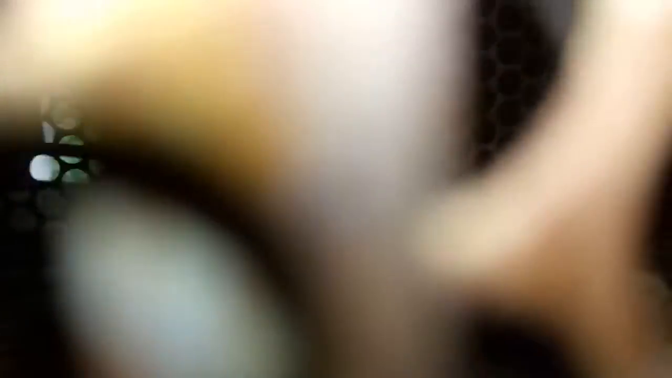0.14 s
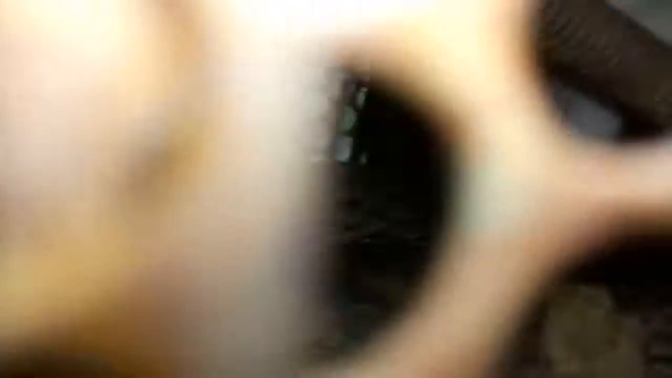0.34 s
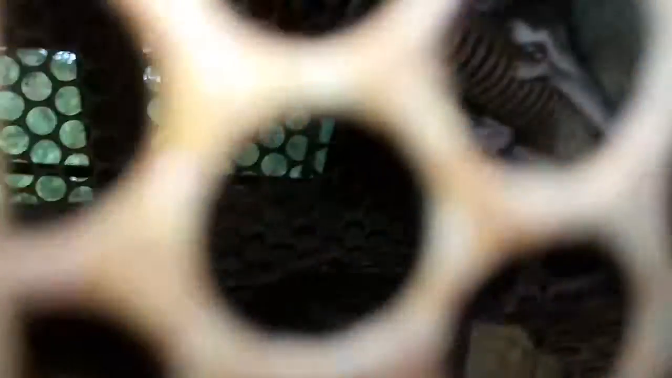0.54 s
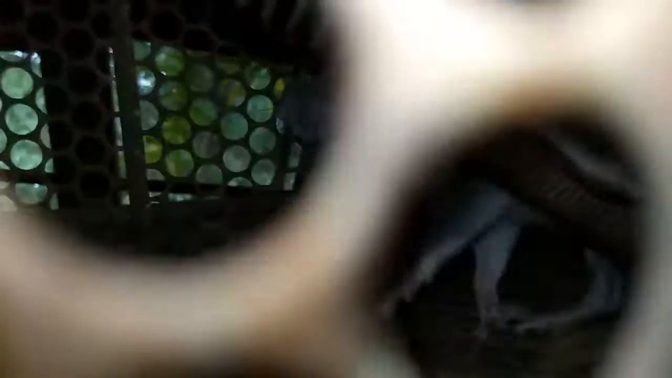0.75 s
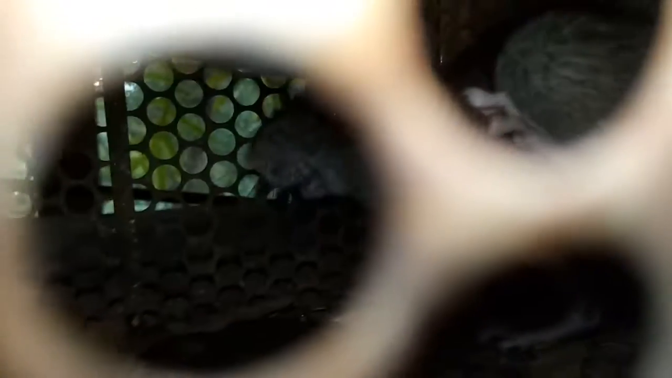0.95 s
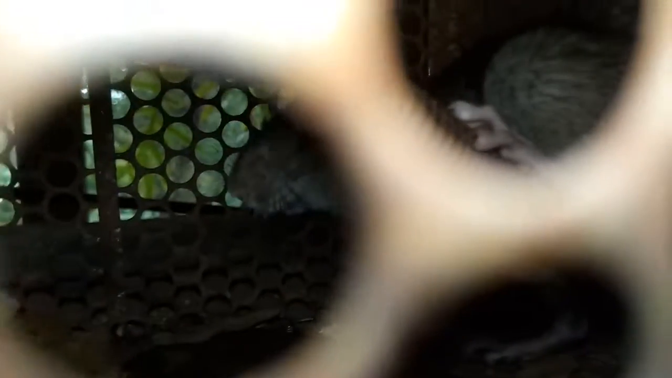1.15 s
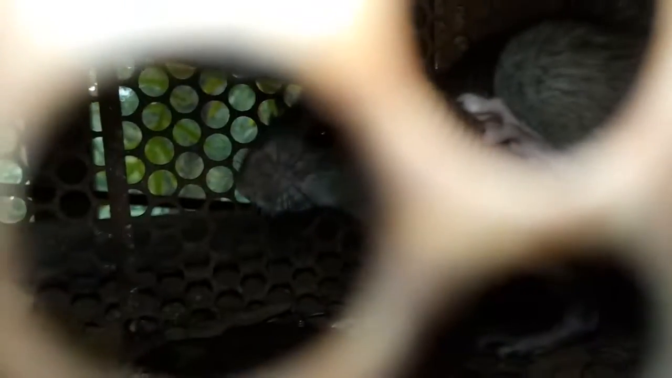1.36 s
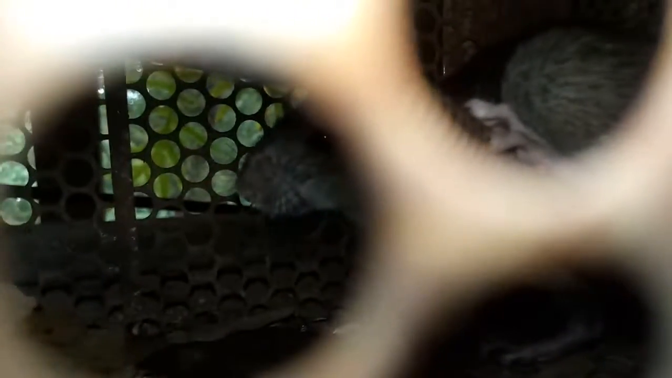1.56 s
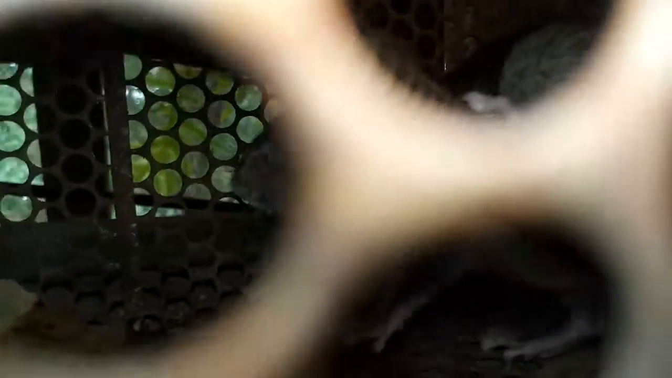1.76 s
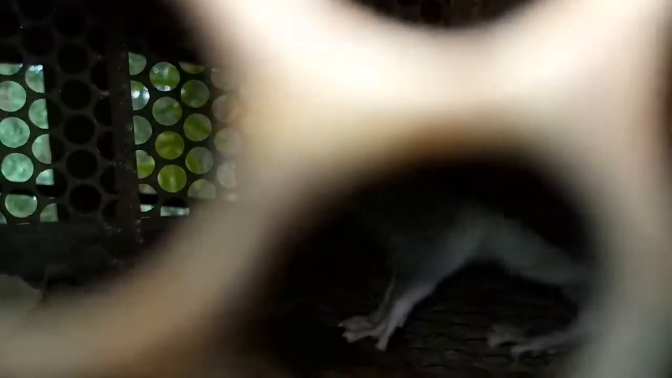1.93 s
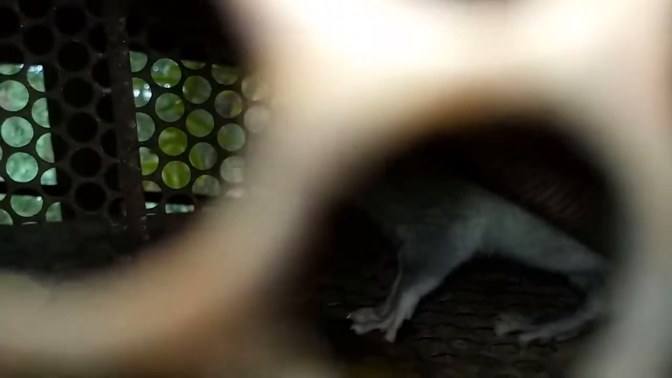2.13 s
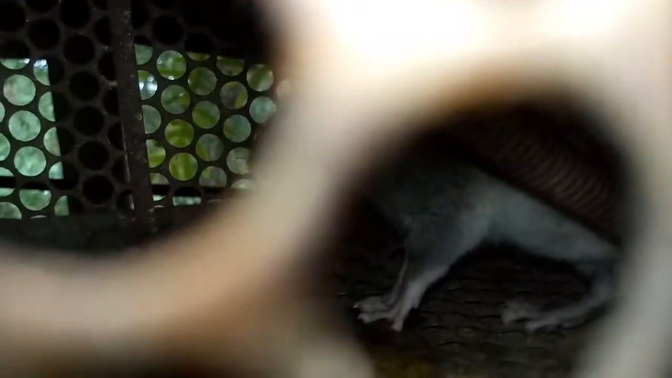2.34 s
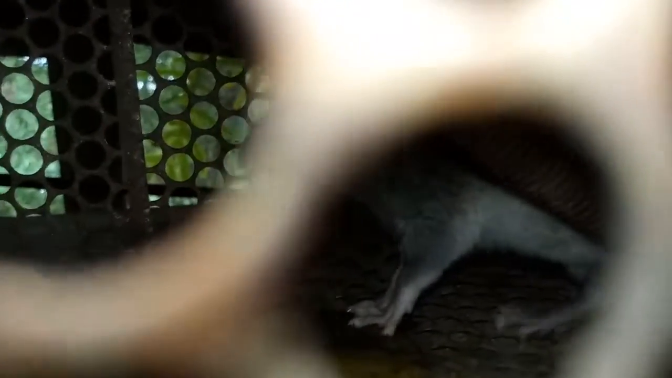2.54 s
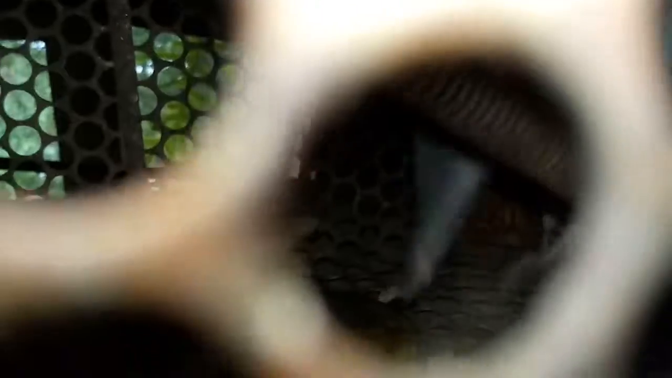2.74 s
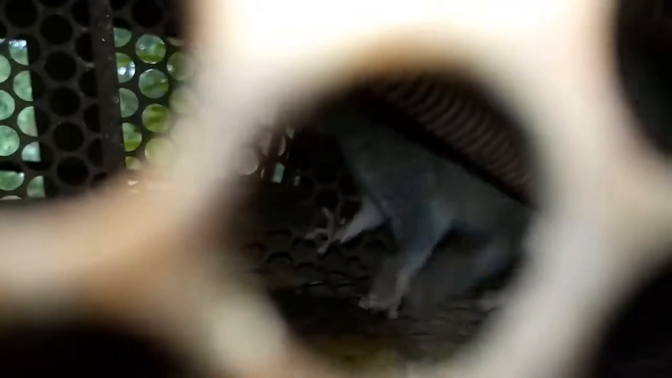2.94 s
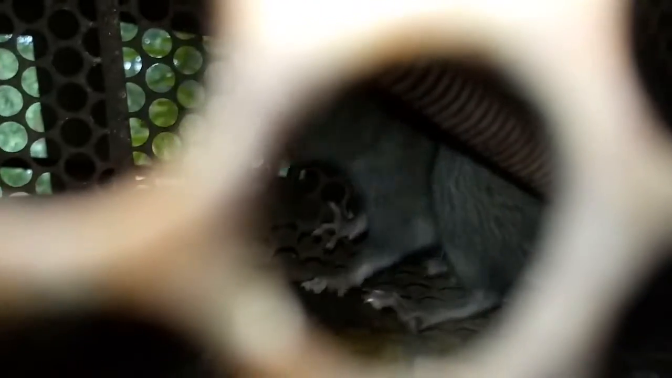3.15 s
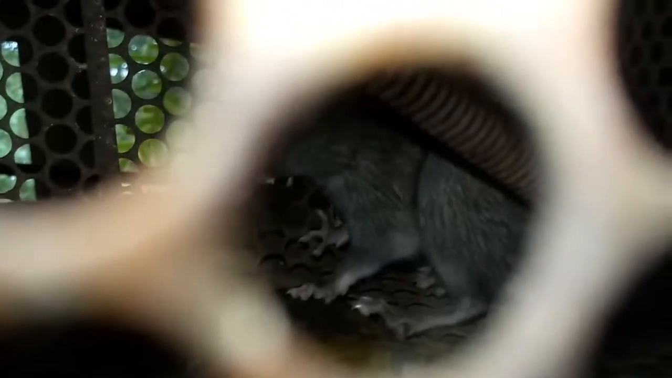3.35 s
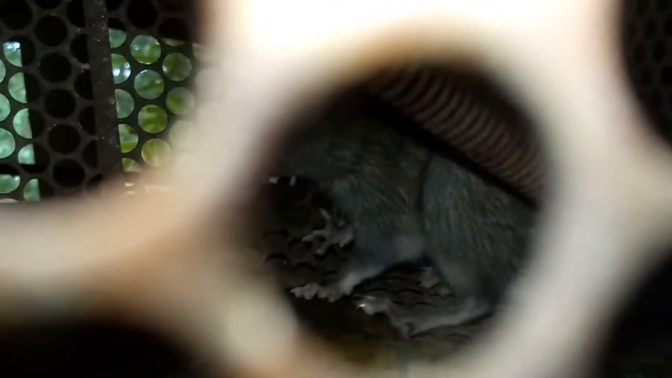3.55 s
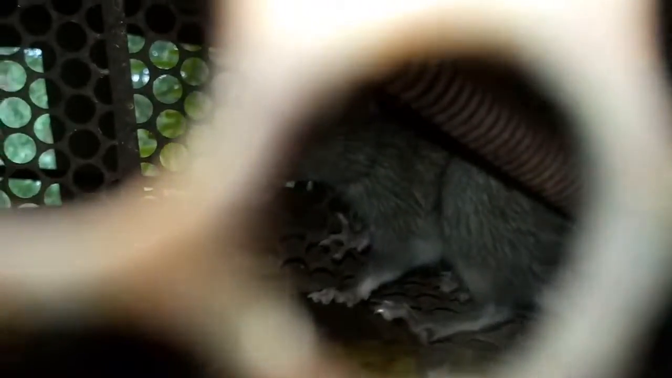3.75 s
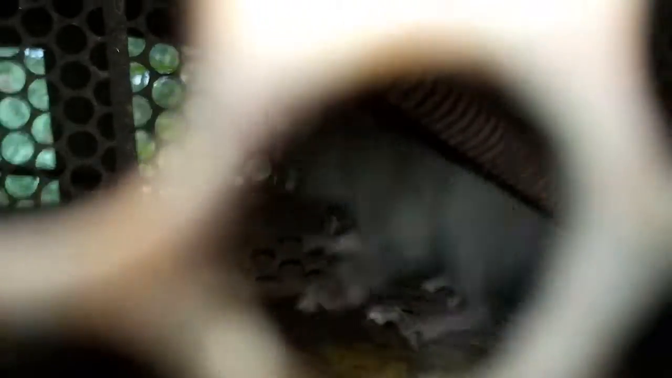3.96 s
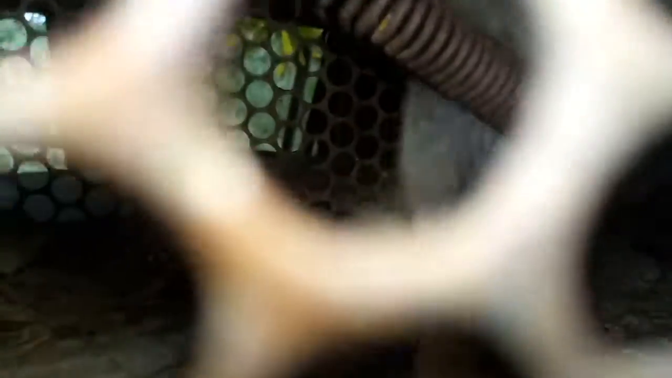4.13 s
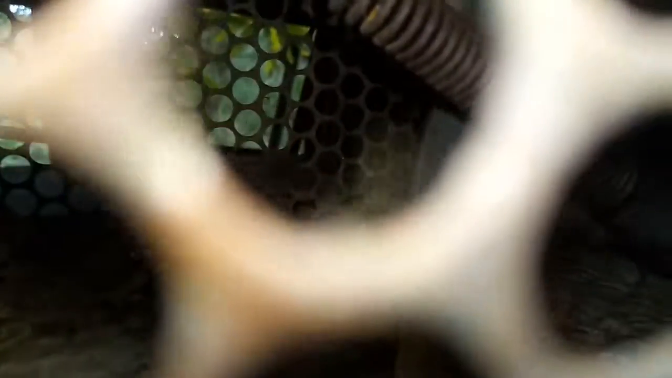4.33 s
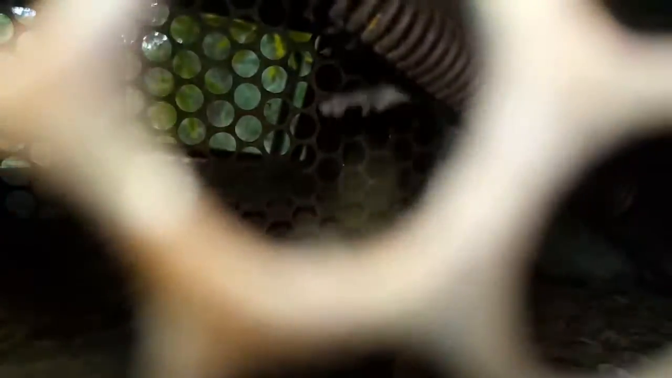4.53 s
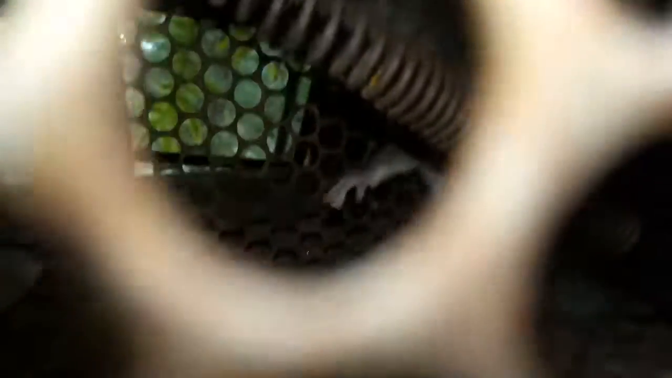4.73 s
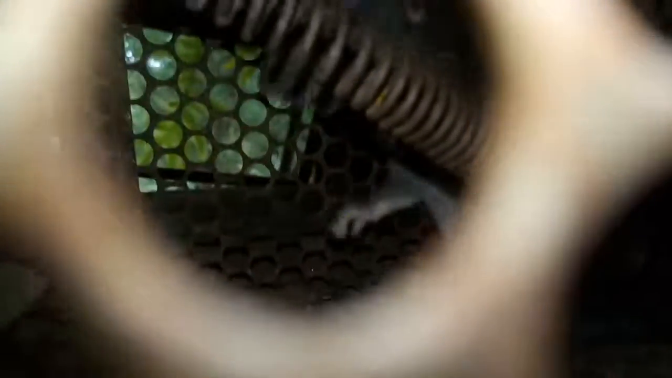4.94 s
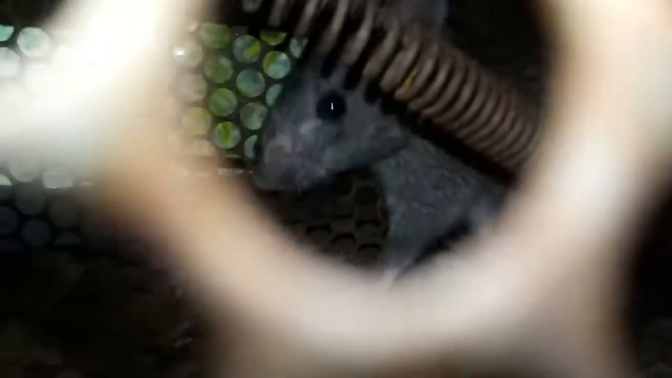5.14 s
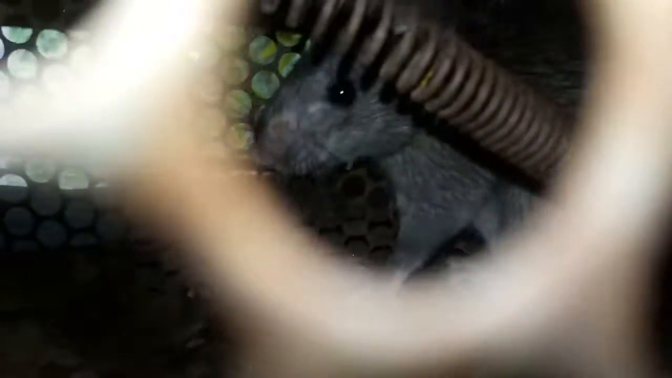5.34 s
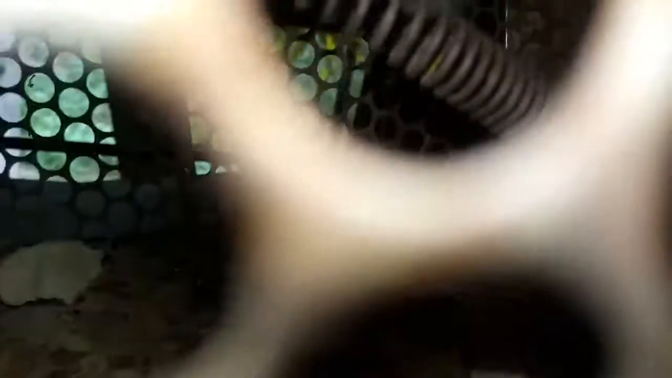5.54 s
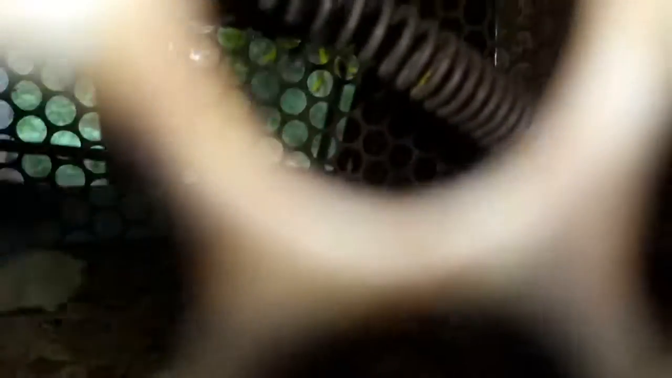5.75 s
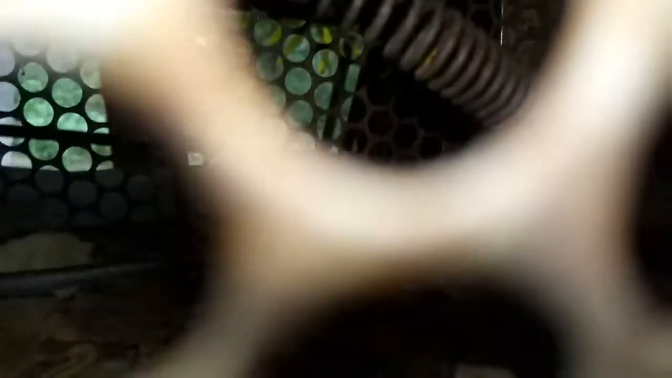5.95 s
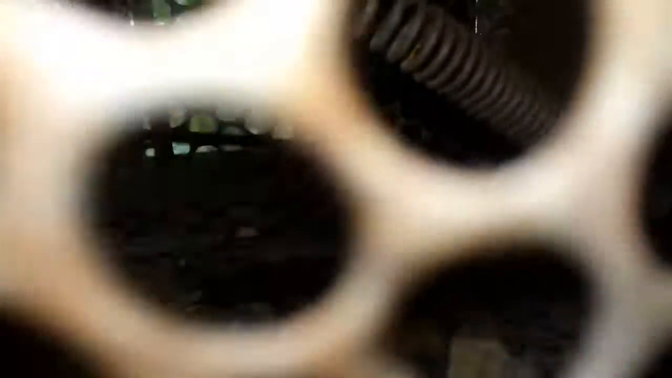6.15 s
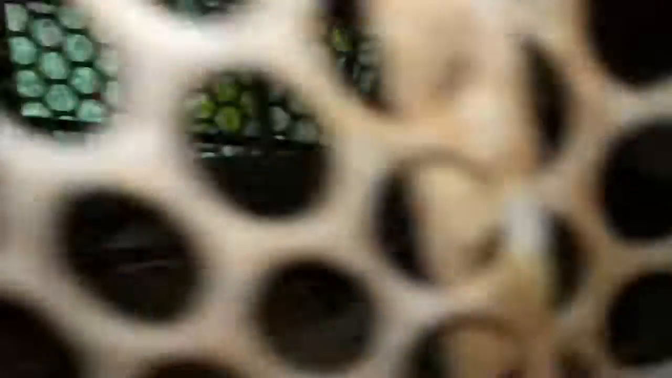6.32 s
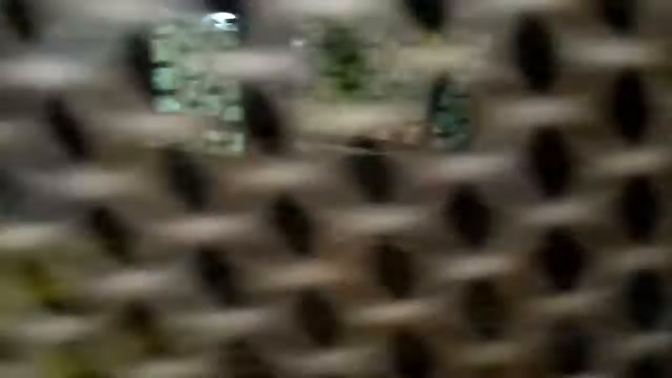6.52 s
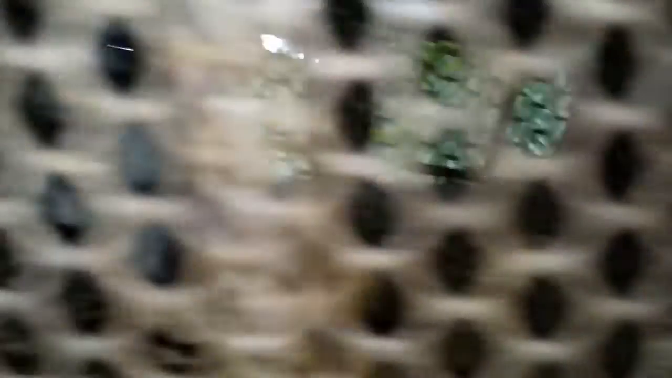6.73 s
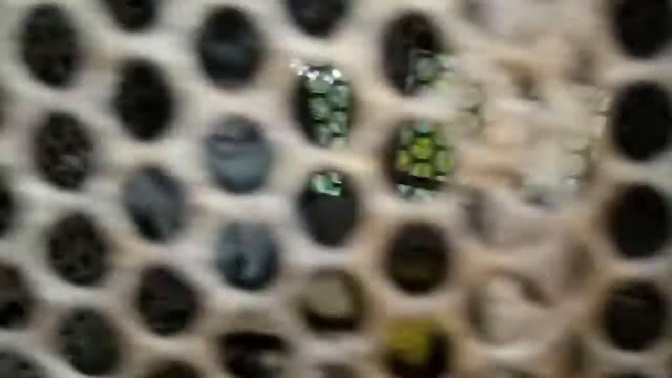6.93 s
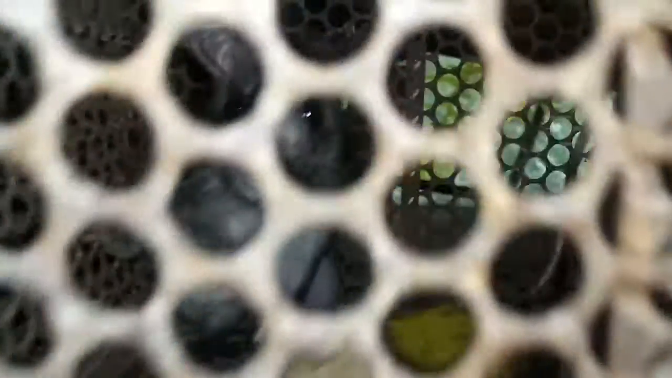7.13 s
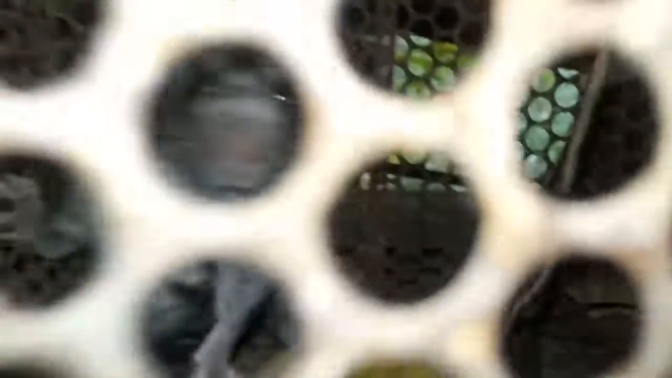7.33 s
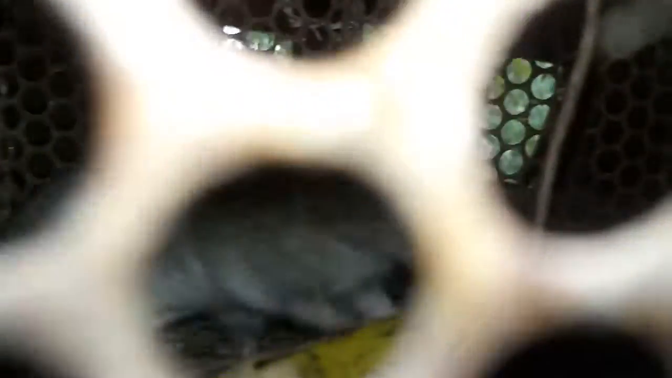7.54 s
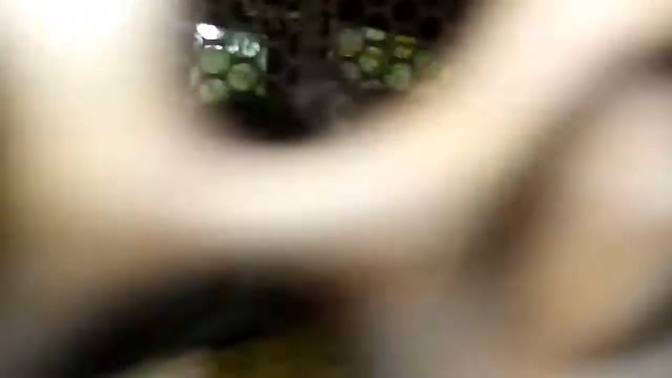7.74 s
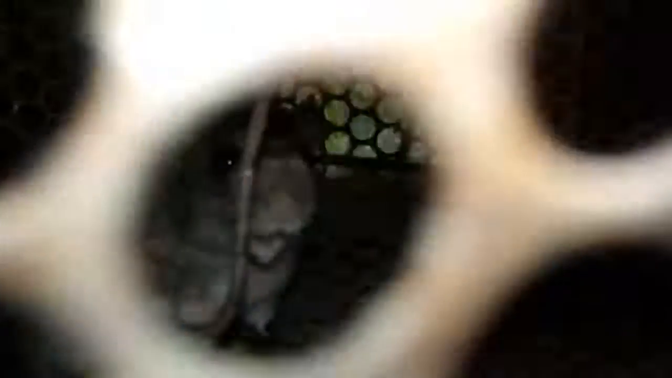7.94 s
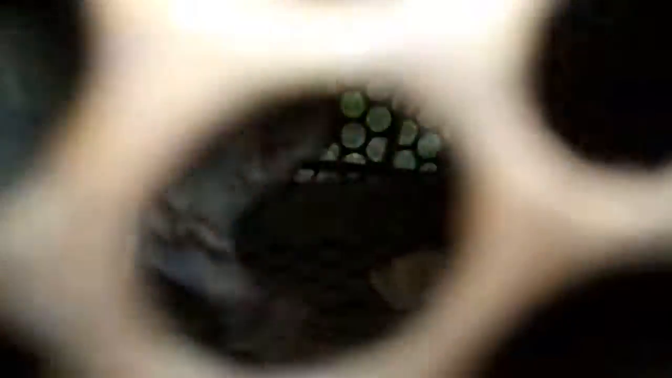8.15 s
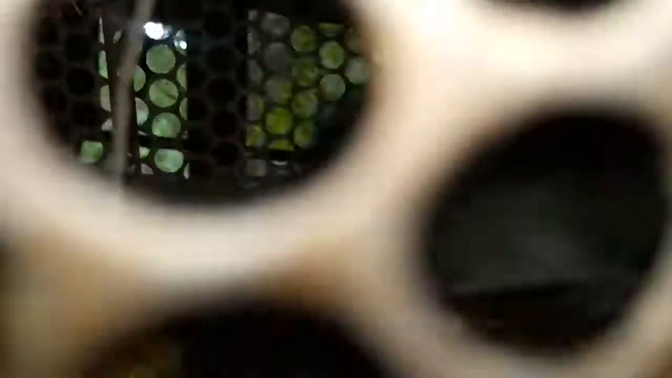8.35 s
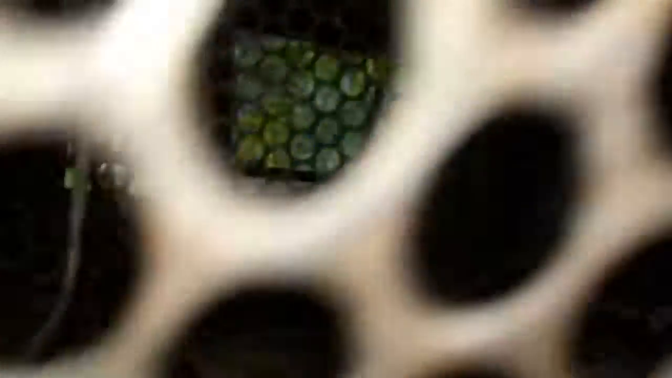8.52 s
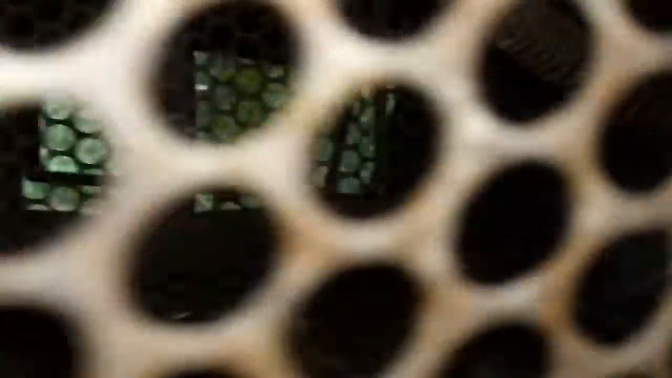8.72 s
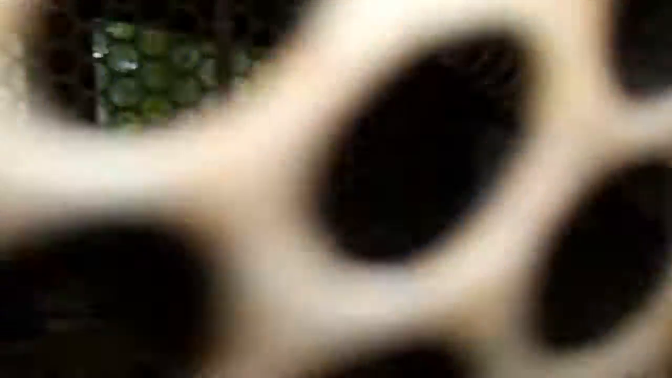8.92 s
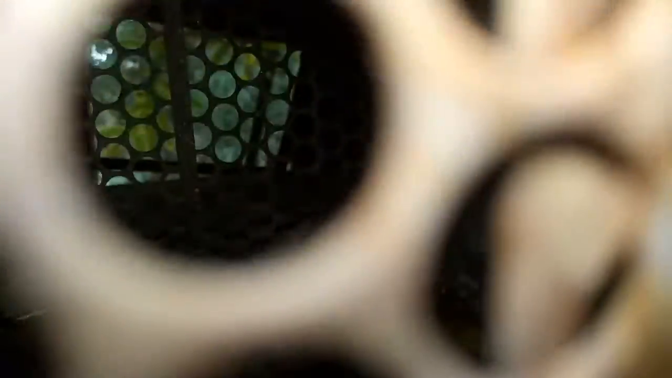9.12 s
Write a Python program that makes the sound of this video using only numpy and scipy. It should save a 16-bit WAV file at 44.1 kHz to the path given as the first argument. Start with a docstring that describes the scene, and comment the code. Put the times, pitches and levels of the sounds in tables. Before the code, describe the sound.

A phone held against a metal cage picks up close, boxy thuds with loose panel rattle and bright mesh buzz. Between them the rat makes very short raspy chirps, each ending in a puff of air, then clusters of thin quivering squeals with cracks. Low hand rumble, small creaks and scuffles come and go. Behind is quiet steady outdoor air with a few faint far bird whistles.

```python
"""At a cage trap of perforated sheet metal outdoors, a phone held against the holes hears the rat inside.
Bangs, knocks, sharp ticks and faint short buzzes are pushes and fading noise that ring the cage's resonances.
The rat chirps hoarsely and squeals near 1.75 kHz: trembling overtones pass through its mouth and throat.
Lumpy noise makes the rumbling hand, creaks, scuffles and, near 2 s, a faint breath-like swell.
Gliding sines make faint far birds; steady coloured noise is the outdoor hiss."""
import sys
import numpy as np
from scipy import signal
from scipy.fft import rfft, irfft, next_fast_len
from scipy.io import wavfile
from scipy.ndimage import map_coordinates

SR = 44100
rng = np.random.default_rng(int(sys.argv[2]) if len(sys.argv) > 2 else 0)


def file_out(sig):
    """Save sig as 16-bit WAV at sys.argv[1]."""
    # one column per channel
    cols = np.atleast_2d(sig).T
    # limit, then scale
    lim = np.clip(cols, -1, 1)
    pcm = np.round(lim * 32767).astype(np.int16)
    wavfile.write(sys.argv[1], SR, pcm)


N = 404838  # length in samples

# The notes the cage rings with. Each row: frequency in Hz, width in Hz, level in dB.
CAGE_MODES = [(102.4, 26, 5.5), (296, 38, 3), (424.7, 10, 1), (575, 12, 3), (824.4, 16, -3),
              (957, 8.5, -2.5), (1072, 15, -8.5), (1311, 13, -2), (1576, 12, -5), (1860, 15, -7.5),
              (2872, 19, -2)]
# Tone colour of the rattling wall panels. Each row: frequency in Hz, relative level in dB.
PANEL_COLOUR = [(260, -18), (450, 0), (1400, -4), (1860, -6.5), (2670, -14.5), (3200, -15.5), (4160, -26),
                (7040, -120)]
# Tone colour of the wire mesh. Each row: frequency in Hz, relative level in dB.
MESH_COLOUR = [(1290, -21), (2200, -18.5), (2690, -8.5), (3530, -2.5), (4310, -5.5), (5720, 2.5),
               (8030, -14.5), (12500, -29), (15100, -19.5), (16000, -12.5)]


def amp(db):
    """Turn decibels into a plain multiplier."""
    return 10 ** (np.asarray(db) / 20)


def unit(x):
    """Scale a sound to an average (rms) strength of 1."""
    return x / np.sqrt(np.mean(x ** 2) + 1e-20)


def add(track, s, x):
    """Mix x into the track at s seconds, cutting off whatever falls outside."""
    x = x[max(-round(s * SR), 0):]
    part = track[max(round(s * SR), 0):][:len(x)]
    part += x[:len(part)]


def curves(rows, t):
    """Join the rows with straight lines: one curve over time for each column after the first."""
    s, *cols = np.transpose(rows)
    return [np.interp(t, s, c) for c in cols]


def wobble(rate, size=N):
    """A smooth random curve with a new random value `rate` times a second."""
    knots = rng.standard_normal(int(size * rate / SR) + 4)
    return map_coordinates(knots, [np.arange(size) * rate / SR], order=2)


def filtered(x, response):
    """Multiply the spectrum of x by a response that depends on frequency."""
    m = next_fast_len(len(x) + 8192)  # spare room at the end for ringing
    return irfft(rfft(x, m) * response(np.fft.rfftfreq(m, 1 / SR)), m)[:len(x)]


def colour(points):
    """A tone colour drawn through (Hz, dB) points on a logarithmic frequency axis."""
    f, db = np.transpose(points)
    return lambda hz: amp(np.interp(np.log(hz + 1), np.log(f + 1), db))


def modes(rows):
    """Resonances side by side, with alternating sign, that ring only after they are struck."""
    def response(f):
        total = 0
        for k, (centre, width, db) in enumerate(rows):
            peak = 1j * f * width / (centre * centre - f * f + 1j * f * width)
            total = total + (-1) ** k * amp(db) * peak
        return total
    return response


def grit(points, grain_db, rate=700):
    """Coloured noise of rms 1, broken into grains by a fast random gain."""
    grains = rng.standard_normal(N) * amp(grain_db * wobble(rate))
    return unit(filtered(grains, colour(points)))


def cage():
    """Each contact pushes the box and excites panels and mesh; pushes and noise ring the cage's modes."""
    # Heavy bangs. Each row: start in seconds, thud, panel and mesh strength in dB (offset below),
    # seconds the level sags only slowly, then time to fall 60 dB in seconds.
    bangs = [(-0.05, 3, -14, -23.5, 0.11, 0.17), (2.688, 3.5, -18.5, -20, 0.098, 0.23),
             (4.079, 4, -17.5, -21.5, 0.096, 0.27), (5.503, 5.5, -19, -20, 0.11, 0.39),
             (5.786, -64.5, -27.5, -29.5, 0.06, 0.68), (7.988, -39, -29.5, -35, 0.019, 0.29),
             (8.206, 3, -17, -17.5, 0.079, 0.38)]
    # Light knocks of the body on the walls. Each row: start in seconds, thud and panel strength in dB
    # (offset below), time to fall 60 dB in seconds, pitch of the struck wall in Hz.
    knocks = [(0.279, -66.5, -29.5, 0.37, 1360), (0.391, -41, -40, 0.07, 590),
              (0.469, -56, -39, 0.49, 1000), (0.844, -24, -30, 0.081, 618), (1.006, -35, -31, 0.36, 410),
              (3.245, -36.5, -39, 0.14, 830), (4.851, -41, -41.5, 0.13, 652),
              (5.843, -50, -14.5, 0.12, 647), (7.718, -22.5, -67, 1, 479), (7.787, -18.5, -33, 0.1, 710),
              (7.946, -17, -25.5, 0.078, 790), (8.04, -40, -26, 0.055, 895),
              (8.434, -47.5, -33.5, 0.074, 915), (9.099, -18.5, -25.5, 0.1, 658),
              (9.127, -28, -19, 0.034, 630), (9.139, -38, -24.5, 0.081, 643)]
    # Sharp ticks on the mesh and a few faint short buzzes. Each row: start in seconds, strength in dB
    # (offset below), time to fall 60 dB in seconds.
    ticks = [(0.276, -17.5, 0.13), (0.468, -39, 0.14), (0.592, -41, 0.13), (1.736, -53.5, 0.041),
             (1.811, -50.5, .05), (2.361, -47, 0.069), (2.445, -49, 0.04), (4.704, -28.5, 0.044),
             (8.597, -45, 0.087)]
    # The box as a whole. Each row: frequency in Hz, width in Hz, level in dB.
    thud = [(105, 21, -16), (340, 630, -7), (685, 160, -16.5)]
    knock_mesh_db = -12.5  # mesh strength relative to a knock's panel strength
    tick_panel_db = -33.5  # panel strength relative to a tick or buzz
    swell_s, swell_from_db = 0.089, -6.5  # after a loud thud the rattle starts softer and swells
    tap_rise_s, tap_t60_s = 0.0016, 0.029  # the struck wall's own short note
    push, tap, note, boom, panel, loose, mesh = np.zeros((7, N))
    t = np.arange(SR // 2) / SR
    # The last value sets the tap level in dB and, below zero, marks a bang.
    blows = [(*row, -14) for row in bangs]
    blows += [(s, a, b, b + knock_mesh_db, .002, t60, 0) for s, a, b, t60, _ in knocks]
    blows += [(s, -120, db + tick_panel_db, db, .002, t60, 0) for s, db, t60 in ticks]
    for s, thud_db, panel_db, mesh_db, hold_s, t60, direct_db in blows:
        s += .0015  # the contact builds briefly before it sounds
        after = np.maximum(t - hold_s, 0)
        fade = amp(-60 * after / np.maximum(t60, .01) - 33 * np.minimum(t, hold_s))
        fade = fade * (1 - np.exp(-t / 0.001))  # quick onset
        add(boom, s, amp(thud_db - 27.5 - 60 * t / 0.82) * fade)
        swell_db = swell_from_db * np.clip(1 - t / swell_s, 0, 1) * (thud_db > -15)
        add(panel, s, amp(panel_db + swell_db - 15 - .75 * direct_db) * fade)
        add(loose, s, amp(panel_db + swell_db - 5) * fade * (direct_db < 0))  # only bangs shake loose parts
        add(mesh, s, amp(mesh_db - 5.5) * fade * amp(-60 * after / 1.4))
        add(push, s, amp(thud_db + 2.5) * np.diff(np.hanning(130)) * 20)  # the wall gives, then springs back
        add(tap, s, amp(panel_db + direct_db + 17) * np.hanning(24))
    for s, _, panel_db, _, hz in knocks:
        level = amp(panel_db + 9.0 - 60 * t / tap_t60_s)
        rise = 1 - np.exp(-(t / tap_rise_s) ** 2)
        add(note, s, level * rise * np.sin(2 * np.pi * hz * t))
    rattle = amp(1.5) * panel * grit(PANEL_COLOUR, grain_db=2.5, rate=200) + clatter(loose)
    rattle = rattle + boom * unit(filtered(rng.standard_normal(N), modes(thud)))
    ring = amp(6.0) * filtered(rattle + amp(-19.5) * (push + tap), modes(CAGE_MODES))
    mesh_noise = mesh * grit(MESH_COLOUR, grain_db=2.0, rate=250)
    return note + filtered(push, modes(thud)) + rattle + ring + mesh_noise


def clatter(shaking):
    """Loose sheet and wire strike each other at uneven moments, each with its own short note."""
    hits, hits_per_s = 4200, 420  # the rate is an average
    middle_hz, pitch_spread, t60_s = 1600, .4, .016
    gaps = -np.log(1 - rng.random(hits)) / hits_per_s
    start = (np.cumsum(gaps) * SR).astype(int)
    spread = rng.standard_normal((hits, 2))
    t = np.arange(700) / SR
    hz = middle_hz * np.exp(pitch_spread * spread[:, :1])
    size = shaking[np.minimum(start, N - 1)][:, None] * amp(1 + 3.56 * spread[:, 1:])
    notes = size * np.sin(2 * np.pi * hz * t) * amp(-60 * t / t60_s)
    places = start[:, None] + np.arange(len(t))
    return np.bincount(places.ravel(), notes.ravel(), N)[:N]  # sum all the notes where they fall


def stirring():
    """Uneven lumps of noise: hand rumble, creaks and scuffles, and near 2 s a faint breath-like swell."""
    # How strong these layers are; near 2 s the creak and scuffle noise swells faintly like a breath.
    # Each row: time in seconds, then hand, creak and scuffle level in dB.
    stir = [(0, -48.5, -31, -41.5), (0.7, -58, -70, -65.5), (0.8, -51, -59.5, -65.5), (1.12, -50, -70, -58),
            (1.22, -69, -84, -97), (1.75, -87, -71.5, -72), (2.0, -77, -59, -58.5),
            (2.4, -82.5, -73.5, -74), (2.95, -61.5, -57, -56.5), (3.45, -76, -77, -60.5),
            (3.6, -75, -71.5, -74), (4.9, -68.5, -57.5, -60.5), (5.3, -62.5, -62, -59.5),
            (6.0, -46.5, -51.5, -57.5), (6.28, -66.5, -64.5, -65), (7.35, -69, -70, -54),
            (7.75, -65, -63.5, -58), (8.7, -63, -69, -59.5), (9.05, -79, -69, -72)]
    # Tone colour of the hand's rumble. Each row: frequency in Hz, relative level in dB.
    hand_colour = [(25, -19), (90, 3.5), (200, -5.5), (400, -5), (800, -61)]
    # Notes in Hz that the mesh hums in the scuffle layer.
    mesh_rings_hz = [5480, 5890, 6300]
    hand_db, creak_db, scuffle_db = curves(stir, np.arange(N) / SR)
    lumps = wobble(27)
    hand = amp(hand_db + 3.3 * wobble(9)) * grit(hand_colour, grain_db=4, rate=120)
    rub = grit(PANEL_COLOUR, grain_db=-0.5, rate=85)
    creak = amp(creak_db + 2 * lumps) * unit(rub + amp(5.0) * filtered(rub, modes(CAGE_MODES)))
    feet = grit(MESH_COLOUR, grain_db=1.5, rate=180)
    hum = filtered(feet, modes([(hz, 43, 4) for hz in mesh_rings_hz]))  # 43 Hz wide, 4 dB
    return hand + creak + amp(scuffle_db + 1.4 * lumps) * unit(feet + hum)


def outdoor_air():
    """Steady outdoor hiss: coloured noise with a fine random grain."""
    # Tone colour of the air. Each row: frequency in Hz, relative level in dB.
    air_colour = [(24, -35), (40, -12.5), (80, -4.5), (276, -9), (770, -14), (7170, -21.5), (8130, -38.5),
                  (16000, -33)]
    return amp(-65.5) * grit(air_colour, grain_db=-2.5)


def bird():
    """Faint far whistles: wavering sines, each gliding to its last pitch and growing softer."""
    # Each row: start in seconds, length in seconds, level at the start in dB, first and last pitch in Hz.
    whistles = [(0.306, 0.34, -52, 5900, 5460), (0.874, 0.28, -64, 4380, 4200),
                (2.255, 0.074, -60, 3760, 3900), (6.054, 0.067, -51, 4200, 3900)]
    longest_glide_s, fade_db = 0.46, -7.5
    out = np.zeros(N)
    for s, length, db, first_hz, last_hz in whistles:
        t = np.arange(0, length, 1 / SR)
        progress = np.clip(t / min(longest_glide_s, length), 0, 1)
        hz = last_hz + (first_hz - last_hz) * np.cos(np.pi / 2 * progress) ** 2
        phase = 2 * np.pi * np.cumsum(hz * (1 + 0.0107 * wobble(77.0, size=len(t)))) / SR
        edge = np.clip(np.minimum(t, length - t) / 0.034, 0, 1)
        level = amp(db + fade_db * t / length + 5 * wobble(90, size=len(t)))
        add(out, s, edge * level * np.sin(phase))
    return out


def folds(hz, doubling):
    """Overtones of the vocal folds; unequal alternate cycles add lines halfway between them."""
    phase = 2 * np.pi * np.cumsum(hz) / SR
    k = np.arange(1, 10)[:, None]
    return (np.cos(k * phase) + doubling * np.cos((k - .5) * phase)).sum(axis=0) * np.sqrt(2)


def chirps(voice, ring, puff):
    """Short calls: the voice starts clear, turns hoarse with doubled cycles, and ends in a puff of air."""
    # Each row: start in seconds, level in dB (offset below), voiced length in seconds, pitch in Hz,
    # mouth ring in dB (offset below), seconds until the voice is fully hoarse.
    calls = [(0.773, -39, 0.034, 1857, 16, 0.016), (2.125, -34, 0.033, 1770, 17, 0.012),
             (2.614, -35, 0.019, 1645, 26.5, 0.0068), (2.895, -41, 0.042, 1718, 25, 0.0042),
             (3.087, -38, 0.034, 1786, 27.5, 0.026), (3.464, -36.5, 0.026, 1996, 27.5, 0.034),
             (3.898, -42, 0.023, 2055, 30.5, 0.024), (4.326, -35.5, 0.019, 1790, 25, 0.017),
             (4.912, -38, 0.024, 1805, 24, 0.011), (5.349, -36, 0.012, 1734, -1, 0.0038),
             (6.647, -33.5, 0.033, 1815, 25, 0.02), (7.426, -30, 0.023, 1835, 29, 0.017),
             (7.945, -34, 0.02, 1740, 5.5, 0.0061), (8.185, -32, 0.02, 1770, 24, .012),
             (8.961, -34.5, 0.031, 1856, 13, .011)]
    hoarse_gain_db = 3.5  # a chirp grows as it turns hoarse
    rasp = .075  # extra fast pitch scatter of the hoarse voice, as a share of the pitch
    puff_db = -8.5  # hiss of air, relative to the level in the row
    t = np.arange(SR // 4) / SR
    for s, db, length, hz, ring_db, hoarse_s in calls:
        opening = 1 - np.exp(-(t / 0.0028) ** 2)
        gate = opening / (1 + np.exp(np.minimum((t - length) / 0.0036, 50)))
        late = np.clip(t / np.maximum(hoarse_s, .003), 0, 1) ** 4  # 0 is clear, 1 is fully hoarse
        waver = .03 * wobble(150, size=len(t)) + (.01 + rasp * late) * wobble(900, size=len(t))
        pitch = hz * (1 - 1.5 * t + waver)
        level = amp(db - 10 + hoarse_gain_db * late + 3 * wobble(500, size=len(t)))
        sound = level * gate * folds(pitch, .8 * late)
        add(voice, s, sound)
        add(ring, s, sound * np.clip(t / 0.015, 0, 1) ** 2 * amp(ring_db - 10.5))
        # Air takes over as the voice stops.
        air_db = db + puff_db - 60 * np.maximum(t - length - .02, 0) / 0.19
        add(puff, s, amp(air_db) * np.clip(t / length, 0, 1) ** 2)


def squeals(voice, ring, puff, fizz):
    """Longer notes with a trembling pitch that droops at the end; strain and cracks double the voice cycles."""
    # Each row: start in seconds, length in seconds, level in dB, pitch at the start in Hz, pitch before
    # the release in Hz, mouth ring in dB, tremble depth as a share, pitch droop in the release as a share.
    notes = [(4.446, 0.15, -46, 1799, 1764, 4, 0.022, 0.065), (4.578, 0.079, -44, 1790, 1730, 10, .02, .06),
             (4.654, 0.1, -41.5, 1822, 1770, 6.5, 0.019, 0.22),
             (5.03, 0.13, -44.5, 1845, 1768, 10, 0.019, 0.1),
             (5.142, 0.044, -41.5, 1850, 1617, 17.5, 0.016, .2),
             (6.321, 0.17, -45.5, 1738, 1728, -16.5, 0.03, 0.15),
             (6.713, 0.17, -42.5, 1843, 1680, 11.5, .022, 0.11),
             (6.865, .41, -44, 1788, 1640, 15.5, 0.017, 0.22),
             (7.524, .11, -42.5, 1876, 1610, 11.5, 0.027, 0.042),
             (7.647, 0.074, -45.5, 1695, 1815, 11.5, .022, 0.12),
             (7.714, 0.066, -41.5, 1860, 1577, 6.5, 0.02, 0.08)]
    # The voice cracks for a moment. Each row: middle in seconds, length in seconds,
    # hiss relative to the note in dB, cycle doubling from 0 to 1.
    cracks = [(5.122, .04, -8, 1), (6.81, 0.018, -5.5, .05), (6.965, .03, 1.5, .05),
              (7.03, 0.039, 0.5, .05)]
    crack_sag = 0.027  # share by which the pitch falls in a crack
    attack_s, attack_from_db, release_s, release_to_db = .014, -8, .045, -11
    strain = .1  # share of the droop added to the tremble in the release
    mouth_shuts_db = -10  # the ring fades by this much in the release
    fizz_db = -29  # treble rasp relative to the ring
    crack_s, crack_length, hiss_db, doubling = np.transpose(cracks)[:, :, None]
    for s, length, level_db, first_hz, last_hz, mouth_db, depth, droop in notes:
        t = np.arange(0, length, 1 / SR)
        opening = np.clip(1 - t / attack_s, 0, 1)
        closing = np.clip(1 - (length - t) / release_s, 0, 1)
        bumps = np.exp(-(2 * (s + t - crack_s) / crack_length) ** 4)
        crack = bumps.sum(axis=0)
        hiss = (bumps * amp(hiss_db)).sum(axis=0)
        halves = (bumps * doubling).sum(axis=0)
        hz = first_hz + (last_hz - first_hz) * t / length
        hz = hz * (1 - droop * closing ** 2 - crack_sag * crack)
        db = level_db + attack_from_db * opening + release_to_db * closing ** 2
        ring_db = mouth_db + mouth_shuts_db * closing
        tremble = np.abs(depth) + strain * droop * closing
        beat = np.sin(2 * np.pi * np.cumsum(88 + 22 * wobble(20, size=len(t))) / SR)  # around 88 Hz
        shake = tremble * (.8 * beat + .6 * wobble(120, size=len(t)))
        shake = shake + tremble ** 2 * 60 * wobble(900, size=len(t))
        edge = np.clip(np.minimum(t, length - t) / 0.0023, 0, 1)
        level = amp(db + 96 * tremble * wobble(97, size=len(t)))
        doubled = np.clip(30 * (tremble - .04) + halves, 0, 1)  # a strained voice doubles its period
        sound = edge * level * folds(hz * (1 + shake), doubled)
        add(voice, s, sound)
        add(ring, s, sound * amp(ring_db + 3 * wobble(75, size=len(t))))
        breath = amp(db + .5 * mouth_db + 170 * tremble - 26.5)
        add(puff, s, edge * (breath + amp(db) * hiss))
        add(fizz, s, edge * amp(db + mouth_db + fizz_db))


def rat():
    """Chirps and squeals pass the mouth, whose ring at 3.4 and 5.4 kHz turns pitch tremble into throbs."""
    # Tone colour of the rat's breath. Each row: frequency in Hz, relative level in dB.
    breath_colour = [(290, -48), (500, -23), (1250, 5), (1600, 4.5), (2400, -4), (4200, -1.5), (5500, 6),
                     (6900, 4), (8960, -13), (11000, -8), (13500, -15), (15300, -6.5), (16000, 2)]
    # How the mouth colours the voice. Each row: frequency in Hz, level in dB.
    mouth = [(500, -52), (900, 0.5), (1750, -1), (3500, -18), (4600, -5), (6500, 1.5), (7200, -17.5),
             (8600, -27.5), (10500, -19), (12200, -31.5), (13800, -37), (15300, -21)]
    voice, ring, puff, fizz = np.zeros((4, N))
    chirps(voice, ring, puff)
    squeals(voice, ring, puff, fizz)
    throat = modes([(3400, 2050, -9.5), (5390, 580, -3)])
    breath = grit(breath_colour, grain_db=2.5)
    treble = unit(filtered(breath, lambda f: f > 8000))
    air = puff * breath + fizz * treble
    return filtered(voice, colour(mouth)) + filtered(ring, lambda f: throat(f) ** 2) + air  # ring passes twice


def hollow(x, t60):
    """The inside of the cage answers with a short, thin, bright tail of fading noise."""
    t = np.arange(SR // 5) / SR
    tail_colour = colour([(300, -54), (1500, 18.5), (6000, 14.5), (9000, 12.5)])
    tail = filtered(rng.standard_normal(len(t)), tail_colour) * amp(-60 * t / t60)
    return signal.fftconvolve(x, tail / np.linalg.norm(tail))[:N]


def scene():
    """Everything adds up at one microphone; only the rat's voice gets the hollow tail."""
    animal = rat()
    near = animal + amp(-9.0) * hollow(animal, t60=0.13) + cage()
    return (near + stirring() + bird() + outdoor_air())[None]


def record(dry):
    """The phone keeps nothing at or above its band limit of 16 kHz."""
    return filtered(dry[0], lambda hz: hz < 16000)[None]


dry = scene()
out = record(dry)
file_out(out)
```